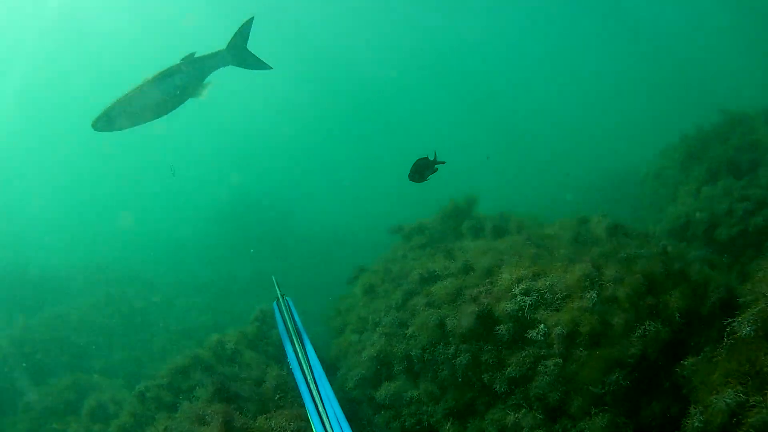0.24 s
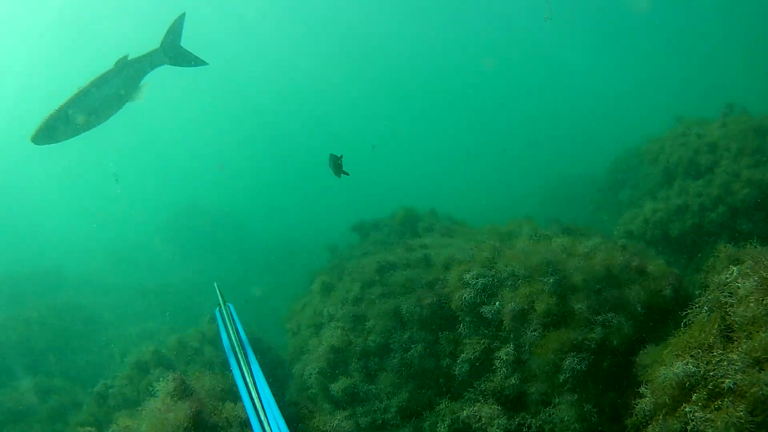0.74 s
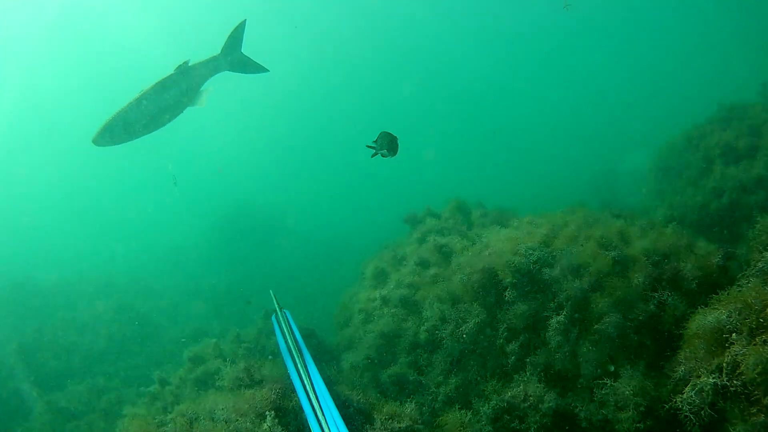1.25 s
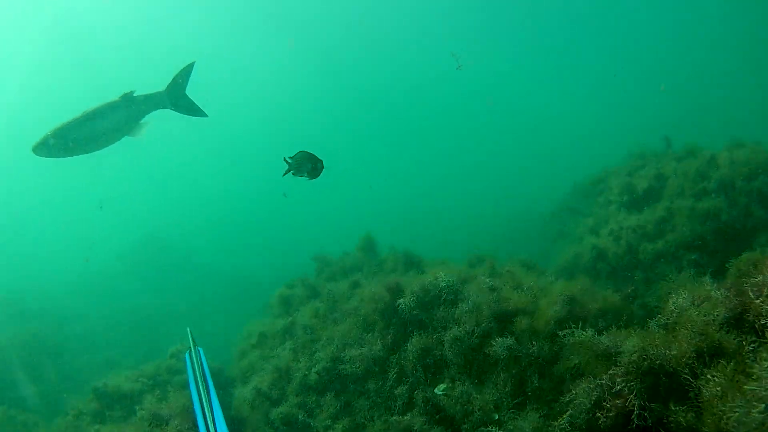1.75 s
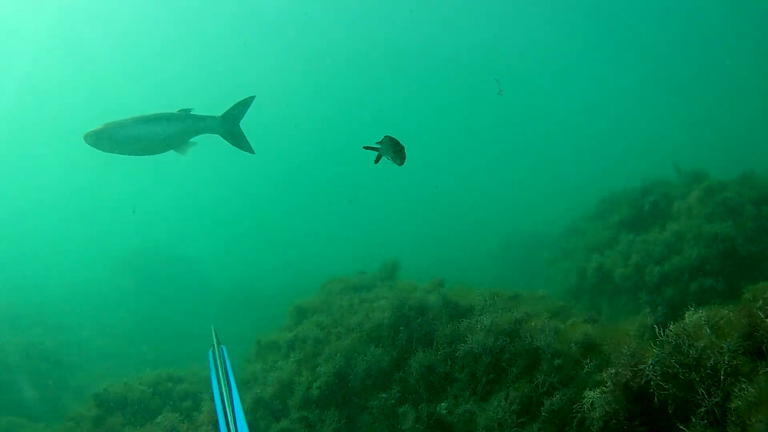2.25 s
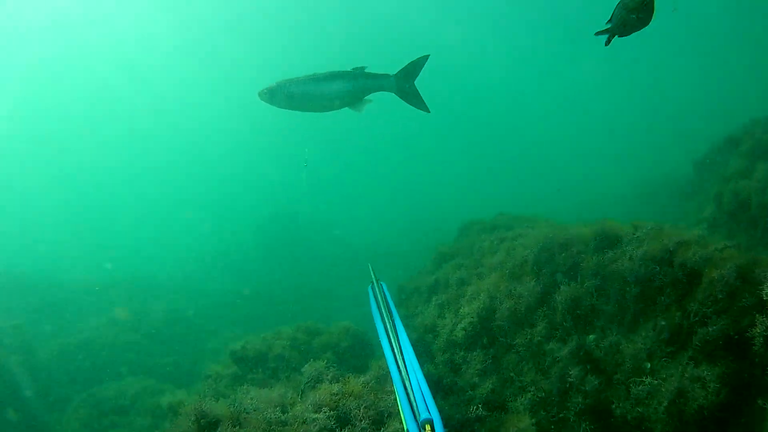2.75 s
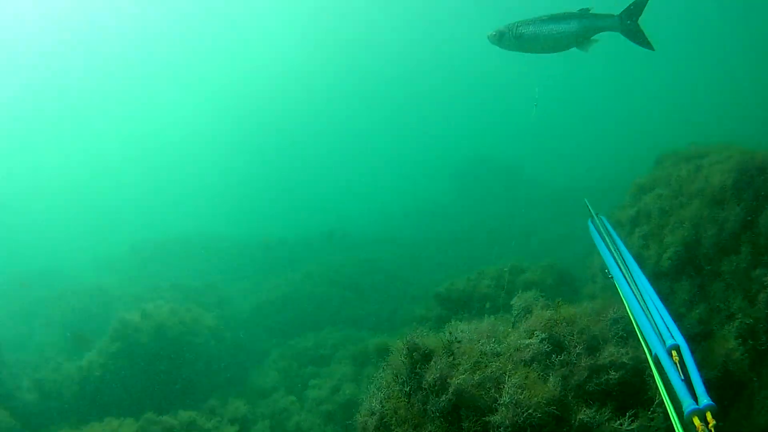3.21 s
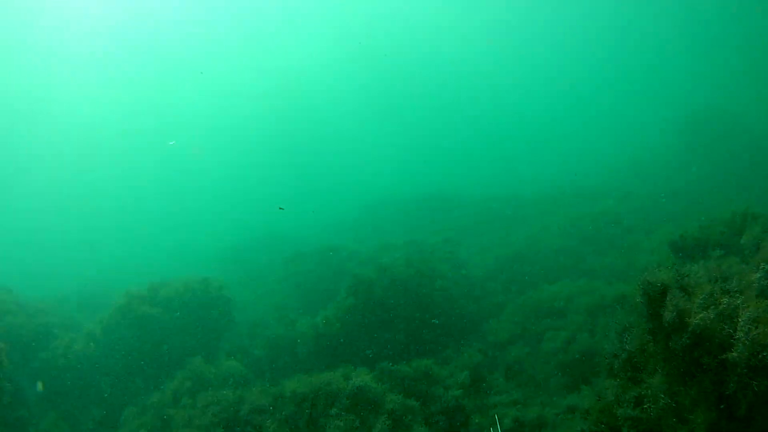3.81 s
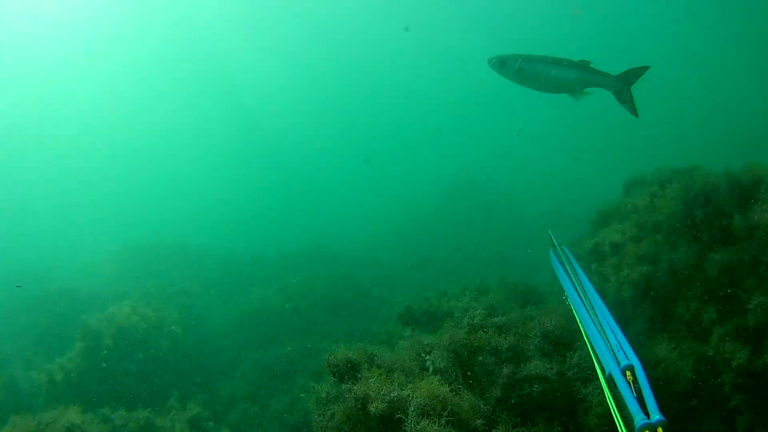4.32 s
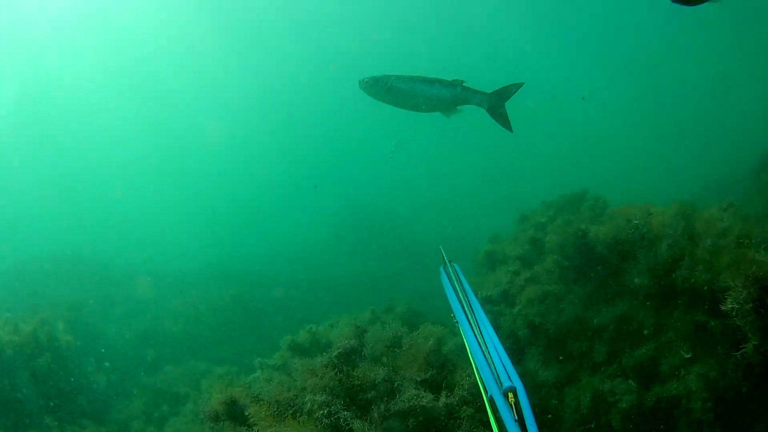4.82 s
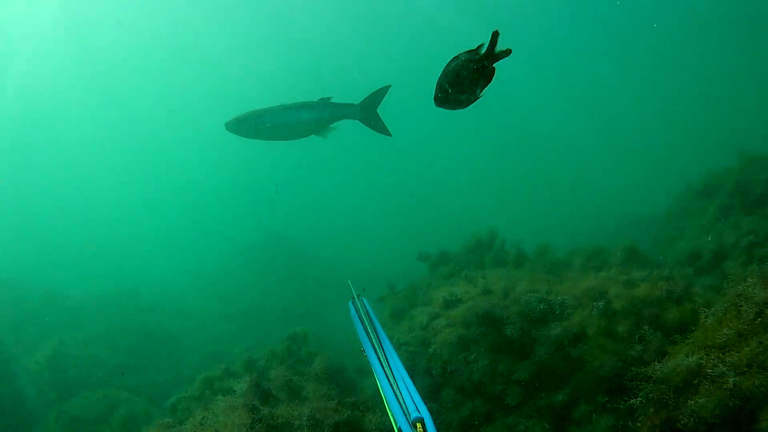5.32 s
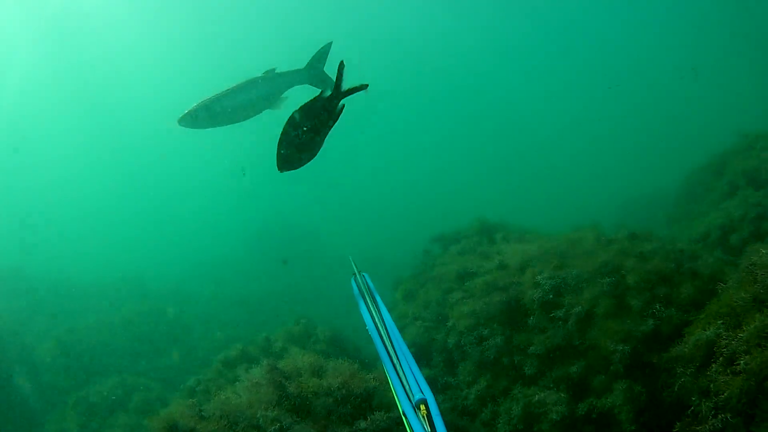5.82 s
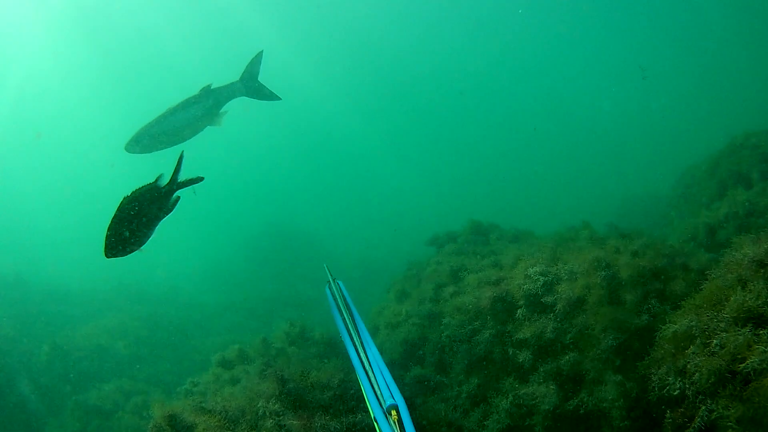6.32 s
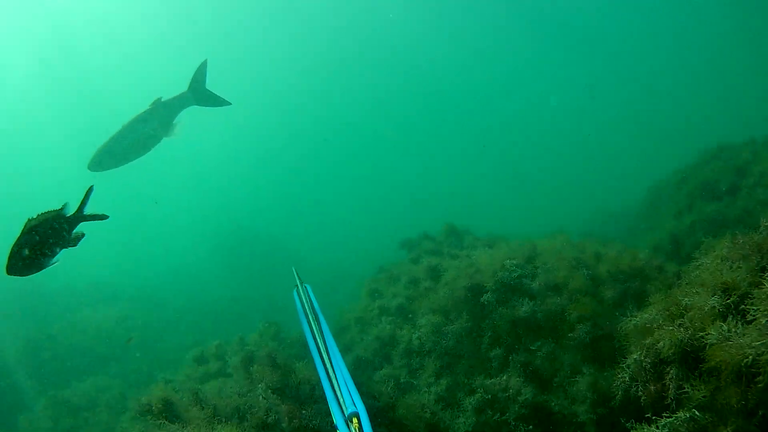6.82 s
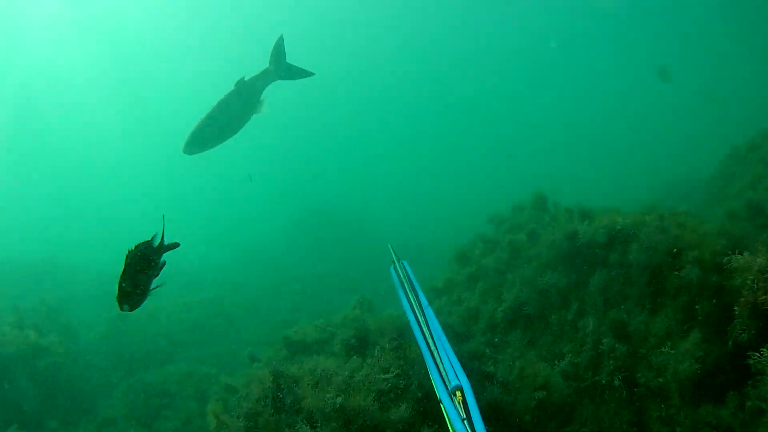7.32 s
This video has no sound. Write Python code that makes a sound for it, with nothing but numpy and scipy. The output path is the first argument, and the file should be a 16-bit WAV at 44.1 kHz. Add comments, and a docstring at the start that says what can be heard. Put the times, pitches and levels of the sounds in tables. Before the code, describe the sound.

A muffled underwater scene heard from inside a camera housing. Low water rush, soft gurgles and the faint crackle of shrimp on a reef fill the quiet opening, with two dull knocks and then a big low bump. Hard plastic clicks from a diver's speargun follow, spaced unevenly at first, then quickening into a regular, loud, close series with short rattles until the end.

```python
"""Hard gear clicks on an underwater housing, ever more regularly, heard from inside the case.
A diver with a speargun holds it: each blow excites damped modes, rebounds once and leaves a rattle.
Around it water rushes as modulated noise and gurgles as short tones, and bumps are swelling low tones.
Shrimp snaps crackle as filtered noise bursts from a weedy reef, the nearer ones over a low knock.
One late click also sets a thin metal part ringing: a few decaying sines with a buzz."""
import sys
import numpy as np
from scipy import signal
from scipy.fft import rfft, irfft
from scipy.io import wavfile

SR = 44100
rng = np.random.default_rng(int(sys.argv[2]) if len(sys.argv) > 2 else 0)


def dump_mix(stems):
    """Bounce the given channels to the path in sys.argv[1] as a 16-bit WAV at rate SR."""
    frames = np.atleast_2d(stems).T  # one column per channel
    limited = np.clip(frames, -1, 1)  # hard clip at full scale
    pcm = np.round(limited * 32767).astype(np.int16)
    wavfile.write(sys.argv[1], SR, pcm)


N = 332955

# In each spectrum below the levels are relative: the noise made from it is scaled to rms 1.
# rush of water: (f/Hz, level/dB per Hz)
WATER_SPECTRUM = [(10, -10), (30, 8.5), (65, -3), (110, 1), (160, -7.5), (220, -15.5), (350, -11),
                  (450, -21), (600, -16.5), (800, -34), (2000, -42), (2600, -38.5), (6000, -55.5)]
# course of the rush, before its overall level: (t/s, level/dB)
FLOW_LEVEL = [(0.0, -45.5), (1.58, -51.5), (1.78, -45), (2.52, -46), (2.88, -48), (3.2, -44), (3.3, -45),
              (3.53, -47.5), (3.66, -46), (5.86, -48), (6.41, -48), (7.55, -46)]
# rate of the eddies' swelling: (f/Hz, level/dB per Hz)
EDDY_SPECTRUM = [(2, 0.5), (12, 7.0), (30, -19.5), (100, -95)]
# mean colour of a snap heard through the housing: (f/Hz, level/dB per Hz)
SNAP_SPECTRUM = [(300, -7.5), (520, 8), (800, -7), (950, 2.5), (1200, -5.5), (1420, 2.5), (1700, -4),
                 (2050, 4), (2350, -16), (3500, -18), (4100, -15.5), (6000, -27), (8000, -35.5),
                 (14000, -64)]
# strongest bumps of water and handling, before their overall level: (t/s, level/dB, f/Hz)
STRONG_BUMPS = [(0.046, -30, 123.6), (0.492, -34, 88), (1.122, -33.5, 109), (2.272, -27, 107),
                (2.586, -27.5, 120), (2.62, -24.5, 89), (3.027, -25, 114), (3.065, -25, 87),
                (3.155, -27, 104), (3.191, -10, 123), (3.207, -18.5, 134), (3.511, -27.5, 73),
                (3.555, -21.5, 76), (3.672, -23.5, 147), (4.462, -24.5, 99)]
# scuffing under a bump: (f/Hz, level/dB per Hz)
SCUFF_SPECTRUM = [(80, -18.5), (180, 13.5), (400, 18), (580, -4), (800, -19.5), (2000, -24), (3500, -53)]
# nearest shrimp snaps and ticks: (t/s, relative level/dB, low knock level/dB)
NEAR_TICKS = [(1.338, -46, -6), (1.62, -44.5, 6), (2.097, -46.5, -4), (2.583, -45.5, 11.5),
              (2.637, -43.5, 12), (2.801, -46, -2), (3.246, -44.5, -6), (3.293, -41.5, 1.5),
              (4.0934, -45.5, 16.5), (5.387, -44, 7), (5.9762, -46, -6), (6.848, -40.5, 8)]
# modes of the housing, at their mean pitch: (f/Hz, relative level/dB, t60/s, build-up/s)
HOUSING_MODES = [(92, 1, 0.058, 0.026), (118.1, -2.5, 0.088, 0.037), (177, -17, 0.11, 0.0065),
                 (264, -27, 0.056, 0.0087), (335, -32.5, 0.057, 0.00036), (426, -11, 0.074, 0.044),
                 (470.3, -12, 0.063, 0.00013), (565, -9.5, 0.038, 0.00021), (681, -28.5, 0.059, 0.0015),
                 (915, -26, 0.036, 0.000086), (980, -30, 0.056, 0.00044), (1107, -36.5, 0.07, 0.0024),
                 (1392, -25.5, 0.016, 0.00072), (1650, -26.5, 0.0048, 0.0003), (1743, -47.5, 0.025, 0.0025),
                 (1840, -22, 0.021, 0.00041), (2078, -23, 0.044, 0.0005), (2670, -12.5, 0.0091, 0.001),
                 (2766, -32, 0.029, 0.0096), (2975, 2, 0.0055, 0.0014), (3862, -13.5, 0.017, 0.00025),
                 (4212, -10, 0.0084, 0.00029), (5440, -17, 0.0099, 0.00042), (5575, -22, 0.014, 0.00006),
                 (6650, -23.5, 0.0078, 0.00054), (7180, -34, 0.014, 0.00056), (8900, -43, 0.013, .00025),
                 (9660, -31, .007, 0.00031)]
# blows of the gear: (t/s, relative level/dB, thud level/dB, snap level/dB, contact hardness f/Hz,
#                     rebound delay t/s, rebound level/dB)
BLOWS = [(1.7231, -20.5, 19, 6, 4600, .012, 5.5), (1.983, -40.5, 0, 12, 6000, 0.0037, -11),
         (1.9924, -15, 15, 2, 6450, .0035, -6.5), (3.7813, -3.5, 6, -5.5, 3400, .006, -18),
         (4.0306, -4.5, 11, 2.5, 2130, .013, -2), (4.3052, 3.5, 8, .5, 2740, 0.01, -2),
         (4.7515, 1, -1.5, -8, 4230, .0061, -9.5), (4.9945, 0, -1, -7.5, 4800, 0.0072, 1),
         (5.2663, .5, -4, -3, 7100, .0064, -2), (5.8392, 0.5, 0, -3.5, 6750, 0.0075, -2.5),
         (6.0649, 0.5, 1, -3.5, 6850, .0059, -9), (6.2808, 1, 0, -2.5, 8000, .0054, -8),
         (6.5127, -1.5, 4, -0.5, 7500, 0.0075, -12), (6.7302, -2.5, 3, -1, 4450, .0059, -8.5),
         (6.946, -0.5, 5, -2, 6000, .0056, 0.5), (7.1798, .5, 2.5, 1, 10400, .0052, -7.5),
         (7.4035, 1.5, 0, -1, 7600, .006, -7.5)]
# dense weak modes that rattle on after a click: (f/Hz, level/dB per Hz)
RATTLE_SPECTRUM = [(90, -7.5), (175, 13.5), (385, 15), (500, 11.5), (620, 8.5), (790, -20.5), (950, -1),
                   (1250, -10), (1450, 3), (2100, 1), (2300, -5.5), (4100, -8.5), (4900, -16), (14000, -50)]
# moments when the thin metal part is set ringing: (t/s, relative level/dB)
METAL_PINGS = [(6.9447, -33.5)]
# modes of the metal part, before the water damps them: (f/Hz, relative level/dB, t60/s)
METAL_MODES = [(2490, 0, 0.26), (3220, -21, 0.056), (3760, 2.5, 0.23), (4113, -19, 0.088),
               (4360, -26, 0.042), (5400, -5, 0.19), (6640, -1, 0.088)]
# buzz of the metal part against its seat: (f/Hz, level/dB per Hz)
BUZZ_SPECTRUM = [(600, -25), (1500, 5), (2700, 0), (4200, 10), (5000, -19), (8000, -52)]
# hiss of the microphone: (f/Hz, level/dB per Hz)
HISS_SPECTRUM = [(1000, 11), (5000, 1), (8000, -3), (11000, -3), (14000, -0.5), (15800, 1.5)]

# a bump of BUMP_DB peaks after SWELL_S; stronger ones come quicker (time halves every SWELL_HALVING_DB)
BUMP_DB, SWELL_S, SWELL_HALVING_DB = -25, 0.0067, 14.5
# scuffing under a bump of pitch SCUFF_HZ; higher bumps scuff more
SCUFF_HZ, SCUFF_DB, SCUFF_DB_PER_OCTAVE = 115, -17.5, 4.5
# the hollow knock of a firm contact; it grows per octave of softer contact and per dB of force
FIRM_HZ, KNOCK_DB, KNOCK_DB_PER_OCTAVE, KNOCK_DB_PER_DB = 6500, 5, 12, 0.9
# the rattle follows the snap of the walls, and is stronger after a lively rebound
RATTLE_DB, RATTLE_DB_PER_REBOUND_DB = -17.5, 0.43
# no two blows land on the same spot, so each wall mode is fed a little differently
PLACE_SPREAD_DB = 1.2
# upper edge of the band
EDGE_HZ = 15900


def amp(db):
    """Logarithmic level: converts decibels to gain."""
    return 10 ** (np.asarray(db) / 20)


def unit(x):
    """Normalisation: scales a signal to rms 1."""
    return x / np.sqrt(np.mean(x ** 2) + 1e-20)


def read(points, hz):
    """Interpolation: joins spectrum points in dB by straight lines over log frequency."""
    f, db = np.transpose(points)
    return np.interp(np.log(hz + 1), np.log(f), db)  # + 1 avoids log(0)


def add(mix, s, sound):
    """Superposition: adds a sound to the mix at s seconds, in place."""
    part = mix[max(round(s * SR), 0):][:len(sound)]
    part += sound[:len(part)]


def noise(points, size):
    """Spectral shaping: filters white noise to the given spectrum, at rms 1."""
    white = rfft(rng.standard_normal(size))
    gain = amp(read(points, np.fft.rfftfreq(size, 1 / SR)))
    return unit(irfft(white * gain, size))


def seconds(size):
    """Sampling: the time axis of a number of samples."""
    return np.arange(size) / SR


def dying(t, t60):
    """Exponential damping: loses 60 dB in t60 seconds."""
    return np.exp(-np.log(1000) * t / t60)


def hump(hz, centre_hz, octaves):
    """Band weighting: a bell over log frequency."""
    return np.exp(-(np.log2(hz / centre_hz) / octaves) ** 2)


def water(level_db=2.8, eddy_db=2.6):
    """Turbulence: a low noise rush follows the flow and swells in small eddies."""
    flow_db = np.interp(seconds(N), *np.transpose(FLOW_LEVEL))
    eddies = noise(EDDY_SPECTRUM, N)
    return amp(level_db + flow_db + eddy_db * eddies) * noise(WATER_SPECTRUM, N)


def gurgles(level_db=-57, per_second=45, spread_db=3.0, low_hz=230, high_hz=640, ring_t60=0.028):
    """Damped resonance: small pockets of stirred water knock softly, each at its own pitch."""
    out, t = np.zeros(N), seconds(size=3000)
    shape = dying(t, ring_t60) * (1 - np.exp(-t / 0.0016))
    for when, size, pitch in rng.random((int(per_second * N / SR), 3)):
        hz = low_hz * (high_hz / low_hz) ** pitch
        gain = amp(spread_db * min(-np.log(size), 3))
        add(out, when * N / SR, gain * shape * np.sin(2 * np.pi * hz * t))
    return amp(level_db) * unit(out)


def snap_colour(spread_db):
    """Path filtering: every path through the reef colours a snap differently."""
    return [(hz, db + spread_db * rng.standard_normal()) for hz, db in SNAP_SPECTRUM]


def shrimp(level_db=-58.5, per_second=260, spread_db=2.5, blur_t60=0.058, path_count=40):
    """Multipath: many distant snaps of unequal size, each smeared and coloured by its path."""
    out, t = np.zeros(N), seconds(size=2048)
    path_db = 5.5
    paths = [noise(snap_colour(path_db), len(t)) * dying(t, blur_t60) for _ in range(path_count)]
    for when, size, path in rng.random((int(per_second * N / SR), 3)):
        gain = amp(spread_db * min(-np.log(size), 4))
        add(out, when * N / SR, gain * paths[int(path * path_count)])
    return amp(level_db) * unit(out)


def bump(db, hz):
    """Impulsive pressure: a soft push rocks the housing for a few cycles, with a little scuffing."""
    t = seconds(size=6000)
    swell_s = SWELL_S * 2 ** ((BUMP_DB - db) / SWELL_HALVING_DB)
    push = t / swell_s * np.exp(1 - t / swell_s)
    scuff_db = SCUFF_DB + SCUFF_DB_PER_OCTAVE * np.log2(hz / SCUFF_HZ)
    scuff = amp(scuff_db) * noise(SCUFF_SPECTRUM, len(t))
    return amp(db) * push * (scuff - np.sin(2 * np.pi * hz * t))


def bumps(strong_db=-1, faint_db=-42, spread_db=6, per_second=1.5, low_hz=80, high_hz=170):
    """Superposed pushes: the strong bumps at set times, and faint ones at random."""
    out = np.zeros(N)
    for s, db, hz in STRONG_BUMPS:
        add(out, s, amp(strong_db) * bump(db, hz))
    for when, size, pitch in rng.random((int(per_second * N / SR), 3)):
        hz = low_hz * (high_hz / low_hz) ** pitch
        add(out, when * N / SR, bump(faint_db + spread_db * (size - .5), hz))
    return out


def tick(low_db, spray_db=4, body_db=-3, body_hz=510, body_t60=0.064, spray_t60=0.061):
    """Early reflection: a soft spray of reflections over a small low knock."""
    t = seconds(size=4096)
    attack = 1 - np.exp(-t / .001)
    path_db = 2.5
    spray = noise(snap_colour(path_db), len(t)) * dying(t, spray_t60)
    hz = body_hz * rng.uniform(.92, 1.16)
    knock = dying(t, body_t60) * np.sin(2 * np.pi * hz * t)
    return attack * (amp(spray_db) * spray + amp(body_db + low_db) * knock)


def ticks(faint_db=-52.0, faint_low_db=-2, spread_db=5, per_second=3):
    """Superposed snaps: the nearest ones at set times, and fainter ones at random."""
    out = np.zeros(N)
    for s, db, low_db in NEAR_TICKS:
        add(out, s, amp(db) * tick(low_db))
    for when, size in rng.random((int(per_second * N / SR), 2)):
        gain = amp(faint_db + spread_db * (size - 1.0))
        add(out, when * N / SR, gain * tick(faint_low_db))
    return out


def housing(detune):
    """Modal vibration: the mode pitches and their ring; a changing grip moves each a little."""
    hz, db, t60, build = np.transpose(HOUSING_MODES)[:, :, None]
    hz = hz * (1 + detune * rng.standard_normal(hz.shape))
    t = seconds(size=6000)
    # neighbouring modes move the wall in opposite directions
    sign = -(-1) ** np.arange(len(hz))[:, None]
    envelope = (1 - np.exp(-t / build)) * dying(t, t60)
    return hz.ravel(), sign * amp(db) * envelope * np.sin(2 * np.pi * hz * t)


def rattle(hard_hz, t60=0.097, build_s=.0025):
    """High modal density: weak modes ring on as noise after a blow, duller after a soft contact."""
    t = seconds(size=6000)
    colour = [(hz, db - 10 * np.log10(1 + (hz / hard_hz) ** 4)) for hz, db in RATTLE_SPECTRUM]
    return (1 - np.exp(-t / build_s)) * dying(t, t60) * noise(colour, len(t))


def clicks(level_db=0, snap_hz=760, wall_hz=1200, light_flight_s=0.0044, landing_hz=9000):
    """Impact excitation: each blow rings the housing, rebounds once and leaves a short rattle."""
    out = np.zeros(N)
    for s, blow_db, thud_db, snap_db, hard_hz, rebound_s, rebound_db in BLOWS:
        hz, modes = housing(detune=.012)
        wall = 1 / (1 + (snap_hz / hz) ** 6)  # selects the modes of the walls, above snap_hz
        place_db = PLACE_SPREAD_DB * wall * rng.standard_normal(len(hz))
        softness_octaves = np.log2(FIRM_HZ / hard_hz)
        knock_db = KNOCK_DB + KNOCK_DB_PER_OCTAVE * softness_octaves + KNOCK_DB_PER_DB * blow_db
        # the place of contact decides which modes are fed; a soft contact misses the high ones
        body_db = thud_db * hump(hz, 132, 0.69) + knock_db * hump(hz, 307, 0.41)
        feed = amp(blow_db + body_db + snap_db * wall + place_db)
        feed = feed / np.sqrt(1 + (hz / hard_hz) ** 6)
        add(out, s, feed @ modes)
        # a quick rebound only ticks the stiff wall modes; a long flight lands heavier and duller
        weight = (rebound_s / light_flight_s) ** 2
        stiff = hz ** 2 / (hz ** 2 + (wall_hz / weight) ** 2)
        landing = stiff / np.sqrt(1 + (hz * weight / landing_hz) ** 4)
        add(out, s + rebound_s, amp(rebound_db) * (feed * landing) @ modes)
        rattle_db = RATTLE_DB + blow_db + snap_db + RATTLE_DB_PER_REBOUND_DB * rebound_db
        add(out, s, amp(rattle_db) * rattle(hard_hz))
    return amp(level_db) * out


def pings(buzz_db=3, buzz_t60=0.48):
    """Fluid damping: the metal part rings and buzzes against its seat until the water damps it."""
    t, out = seconds(size=6000), np.zeros(N)
    ring = sum(amp(db) * dying(t, t60) * np.sin(2 * np.pi * hz * t) for hz, db, t60 in METAL_MODES)
    buzz = amp(buzz_db) * dying(t, buzz_t60) * noise(BUZZ_SPECTRUM, len(t))
    # a quick onset, then a steep fall around 33 ms that overrides the slower decays
    damping = (1 - np.exp(-t / .0005)) * np.exp(-(t / .033) ** 4)
    for s, db in METAL_PINGS:
        add(out, s, amp(db) * (ring + buzz) * damping)
    return out


def scene():
    """Linear superposition: everything reaches one microphone inside the housing."""
    surroundings = water() + gurgles() + shrimp() + bumps() + ticks()
    return (surroundings + clicks() + pings())[None]


def record(dry, hiss_db=-66):
    """Transduction: adds microphone hiss, a soft overload at full scale and the band limit."""
    wet = dry + amp(hiss_db) * noise(HISS_SPECTRUM, N)
    wet = wet / (1 + wet ** 8) ** (1 / 8)
    lowpass = signal.firwin(511, EDGE_HZ, window=("kaiser", 9), fs=SR)
    return signal.oaconvolve(wet, lowpass[None], "same")


dry = scene()
out = record(dry)
dump_mix(out)
```